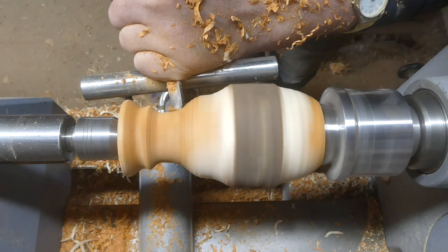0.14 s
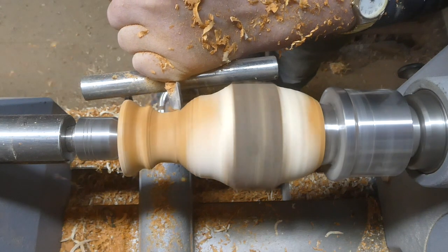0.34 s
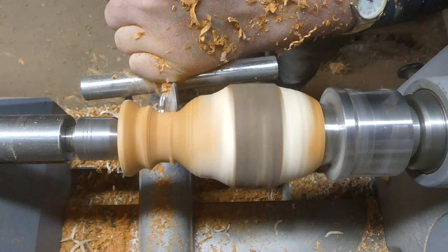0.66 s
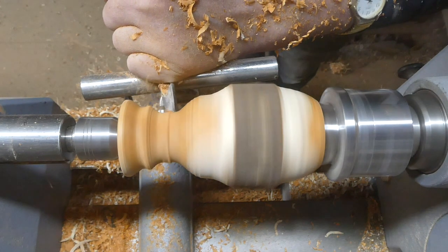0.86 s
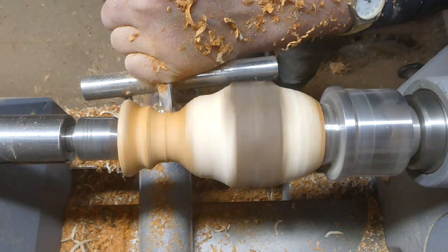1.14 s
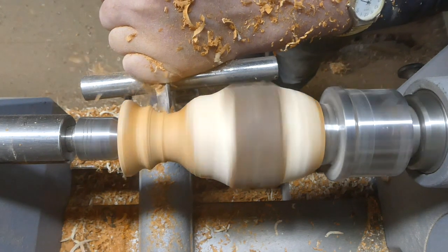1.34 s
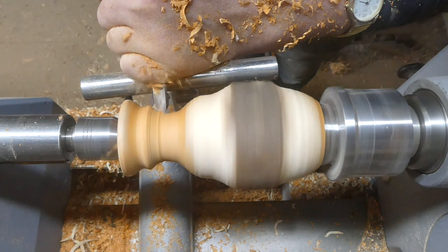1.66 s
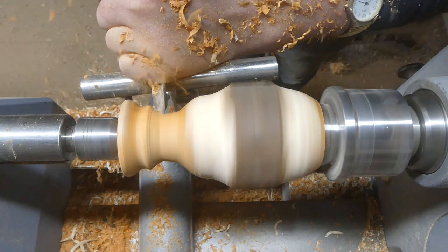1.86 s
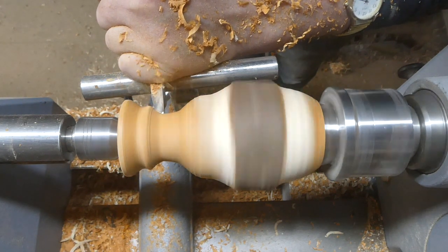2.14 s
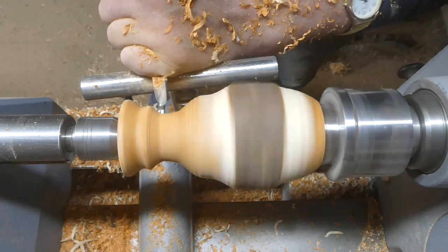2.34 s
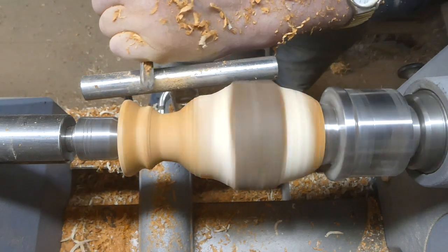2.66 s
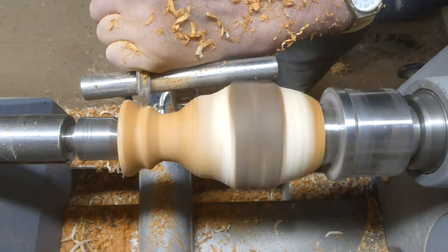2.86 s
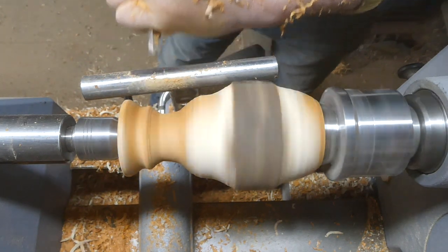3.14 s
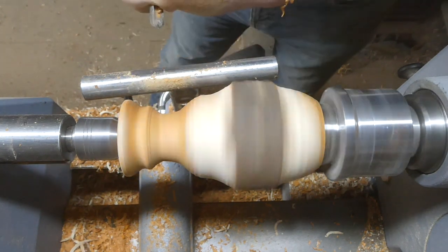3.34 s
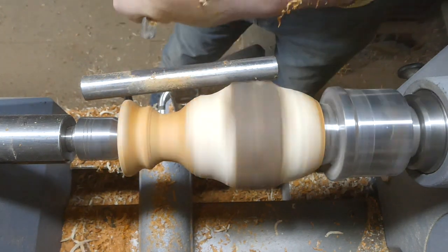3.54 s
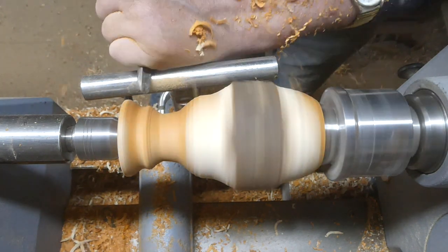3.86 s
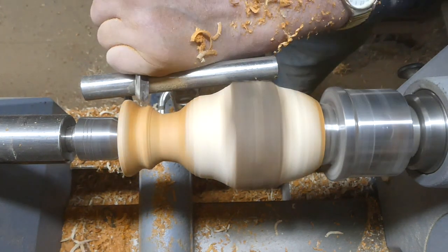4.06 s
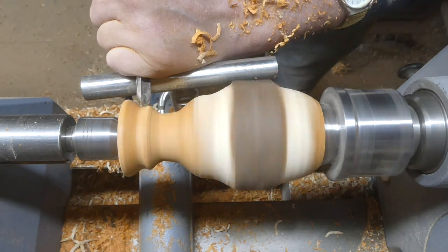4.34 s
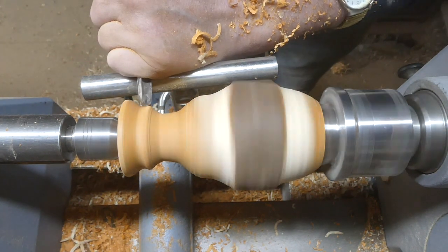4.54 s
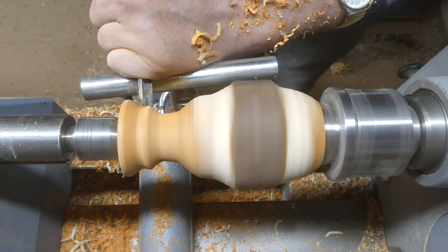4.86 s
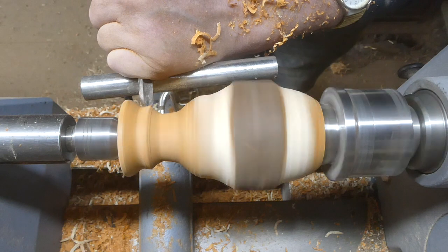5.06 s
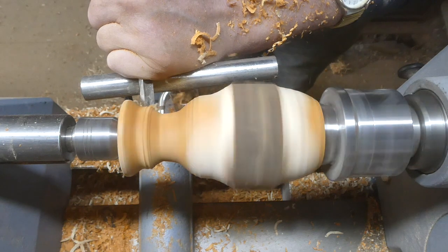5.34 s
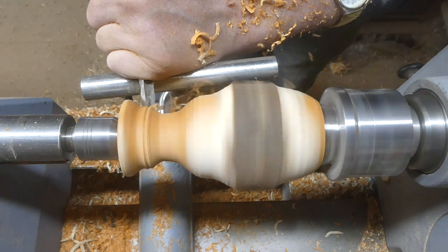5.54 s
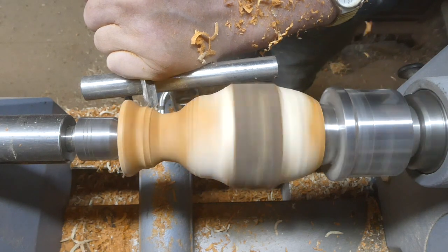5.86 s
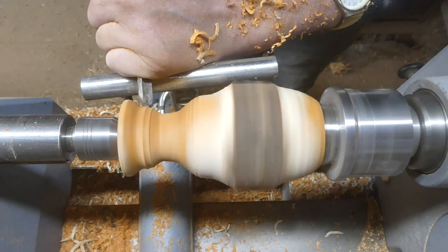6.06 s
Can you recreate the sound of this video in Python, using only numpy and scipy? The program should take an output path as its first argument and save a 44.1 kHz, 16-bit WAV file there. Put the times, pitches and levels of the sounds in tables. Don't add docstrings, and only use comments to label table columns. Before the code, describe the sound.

The sound opens mid-cut, close to a wood lathe: a tool tears spinning wood in a loud, bright rush, fluttering about fifteen times a second and spattered with crisp, high chip snaps. It dips around 0.3 to 0.45 s, then settles into a fuller, more resonant rasp with faint singing tones and drier ticks. From 1.8 s it thins to a scrape and ends near 2.2 s. The motor idles quietly, a low hum with steady tones and a thin high whine, creeping slightly louder. Light steel taps fall at 3.0 and 3.25 s, a rubbing slide with a tap around 3.6 s, and a hard, briefly ringing knock at 3.85 s. A light touch at 4.6 s leads into the second cut from 4.8 s, strong and throbbing with lower, woodier snaps, scraping towards 5.7 s and gone by 5.9 s. The idling hum closes in a short workshop reverberation.

```python
import sys
import numpy as np
from scipy import signal
from scipy.fft import rfft, irfft
from scipy.io import wavfile
from scipy.ndimage import uniform_filter1d

SR = 44100
rng = np.random.default_rng(int(sys.argv[2]) if len(sys.argv) > 2 else 0)


def decibels_to_gain(level_db):
    exponent = np.asarray(level_db, float) / 20
    return 10 ** exponent


def dump(signal):
    limited = np.clip(np.atleast_2d(signal).T, -1, 1)
    pcm = np.round(limited * 32767).astype(np.int16)
    wavfile.write(sys.argv[1], SR, pcm)


N = 273420

# (time [s], pressure [dB], scrape [-1 peeling to 1 scraping])
PASSES = [
    [(0.0, -2, 0), (0.045, -0.5, 0.091), (0.1, -1.5, 0), (0.2, 2.5, 0.043), (0.285, -3.5, 0.47),
     (0.31, -6, 0.24), (0.345, -3.5, 0.45), (0.43, -7, 0.57), (0.53, -3, 0.45)],
    [(0.3, -15, -0.49), (0.5, 0, -0.16), (0.74, -1, -0.079), (0.9, -1.5, -0.022), (1.65, 0, -0.25),
     (1.79, -4, 0.11), (1.83, -6, 0.57), (2.13, -14, 0.94), (2.19, -45, -0.16)],
    [(4.8, -18, .3), (4.835, 0, 0.22), (4.87, 2, -0.13), (5.05, -1.5, -0.11), (5.3, 2, -0.05),
     (5.68, 0, 0.48), (5.76, -4, 0.052), (5.83, -12.5, 0.35), (5.9, -41, .1)],
    [(4.57, -21, 0), (4.605, -0.5, .1), (4.7, -1, 0), (4.79, -4, 0), (4.84, -14, 0)],
]
SETUP_OF_PASS = [0, 1, 2, 2]
GRAIN_OF_SETUP = [0, 0, 1]
# (place [turns], width [turns], level [dB])
GRAIN = [
    [(.21, 0.01, 11), (.32, 0.084, 4), (.56, 0.046, 10), (.78, 0.014, 13)],
    [(1, 0.09, 6.5), (0.51, 0.16, 4.5), (0.35, 0.059, 7), (0.16, 0.028, -2)],
]
TURN_ZERO_S = [0., 0., 4.8]
TURNS_PER_S = [15.385, 15.385, 15.415]

PART_EDGES_HZ = [200, 1000, 2300, 6500, 15500]
SNAP_SHARE = [0.053, 0.45, 0.45, 0.21]
GRAIN_FACTOR = [0.2, 0.37, 0.56, 0.67]
PRESSURE_FACTOR = [0.66, 1.12, 1.21, 0.54]
# (blank, rest, blade, hiss [dB])
PART_DB = [
    [-47, -42, -37, -45.5],
    [-43.5, -39.5, -41.5, -48],
    [-41.5, -40.5, -42, -46],
    [-58, -46, -49, -56],
]
SCRAPE_DB = [
    [-18, 14, 0.1, -26],
    [-3.5, 3, 5.4, 5],
    [-6, -3.5, 9.2, -0.5],
    [-3, 2, 1.1, 0.1],
]
# (frequency [Hz], density [dB/Hz])
CUT_COLOUR = [
    [(88, -49), (150, -11.5), (333, -5.5), (866, -10), (1470, -21), (2120, -9), (2630, -24), (3960, -17),
     (4810, -2.5), (10900, -8.5), (15800, -26)],
    [(88, -28), (150, -14), (771, -1.5), (1010, -12), (1470, 2), (2120, -12), (2740, -5), (4040, -4),
     (5000, -6.5), (7110, -11.5), (9710, -10), (14900, -25.5), (15800, -35)],
    [(88, -40), (150, -15.5), (254, -8), (532, -6), (771, -6), (866, -7), (1890, 5.5), (2390, -11),
     (3320, -7), (4630, -13), (5630, -9), (10100, -17), (15800, -27)],
]
# (frequency [Hz], width [Hz], level [dB])
CUT_RINGS = [
    [(343, 26, -2.5), (1550, 560, 0), (2686, 290, 5), (3320, 1200, -1.5), (4970, 870, 3.5), (9500, 930, -7)],
    [(779.5, 35, 0.5), (948, 28, -2.5), (1110, 7.8, 0.0), (1500, 25, -4), (1784, 45, -4), (1900, 83, -3.5),
     (2690, 25, 0), (3050, 110, -8.5), (3580, 180, -7.5)] + [(2540, 980, -15.5), (4930, 300, -2),
     (9420, 530, -10.0)],
    [(374.0, 16, -5.0), (781, 33, 2.5), (1068, 40, -3.5), (1503, 180, 6.0), (1820, 160, -18),
     (2495, 49, -11.0), (2710, 21, -24)] + [(3290, 180, 2.5), (3680, 470, -2.5), (4620, 500, -1.5),
     (5240, 370, -12.5), (9250, 3400, -7.5)],
]
CUT_RINGS_DB = [3, 4.5, 4.5]

# (time [s], peak [dB], pitch [Hz], t60 [s])
EARLY_CHIPS = [(0.0189, -27, 4930, 0.02), (0.0358, -25, 4970, 0.02), (0.0464, -22, 4870, 0.018),
               (0.0634, -22, 4750, 0.018), (0.075, -25, 4770, 0.021), (0.1504, -27, 4830, 0.018),
               (0.1964, -23, 5090, 0.017), (0.2024, -18, 5300, 0.018), (0.2134, -22, 5100, 0.018),
               (0.2194, -27, 5280, 0.018), (0.2294, -24, 5000, 0.014), (0.2488, -22, 5220, 0.018),
               (0.2643, -17.5, 5150, 0.018), (0.2794, -27, 5160, 0.018), (0.285, -26, 4900, 0.021),
               (0.3301, -29, 5000, 0.018), (0.3364, -27, 4970, 0.018), (0.3451, -24.5, 5030, 0.02),
               (0.3716, -24, 4900, 0.018), (0.409, -22.5, 4940, 0.018), (0.437, -27, 4870, 0.018),
               (0.4723, -25, 5000, 0.018), (0.4894, -26, 5030, 0.018), (0.5054, -27, 4900, 0.018),
               (0.5324, -25, 5010, 0.02), (0.5394, -15.5, 4860, 0.018), (0.5676, -24, 5170, 0.018),
               (0.5973, -23, 4500, 0.018), (0.603, -20, 4970, 0.018), (0.632, -28, 4790, 0.018),
               (0.663, -21, 4400, 0.018), (0.6843, -34, 4960, 0.018), (0.6978, -22.5, 5010, 0.018),
               (0.7216, -24, 5320, 0.018), (0.7262, -22, 4460, 0.02), (0.7317, -21, 5020, 0.018),
               (0.7494, -37, 4970, 0.018), (0.7912, -25.5, 4860, 0.015), (0.8034, -27, 5060, 0.018),
               (0.8644, -31, 4810, 0.016), (0.9572, -26, 4930, 0.018), (0.9931, -27.5, 5230, 0.016)]
# (time [s], peak [dB], pitch [Hz], t60 [s])
LATE_CHIPS = [(1.0061, -21.5, 4900, 0.011), (1.058, -25, 4900, 0.0096), (1.076, -21.5, 5000, 0.011),
              (1.0938, -20, 4670, 0.0082), (1.1377, -25.5, 4550, 0.011), (1.1892, -22, 5180, 0.011),
              (1.2176, -25.5, 4990, 0.011), (1.2535, -27, 4540, 0.011), (1.2764, -25.5, 4830, 0.011),
              (1.3114, -24, 5000, 0.011), (1.3493, -21.5, 4910, 0.011), (1.3844, -20, 5160, 0.013),
              (1.4502, -22, 5000, 0.011), (1.4654, -26, 4640, 0.011), (1.523, -29, 4810, 0.011),
              (1.5344, -25, 4950, 0.013), (1.6382, -27, 5100, 0.011), (1.7085, -26, 4980, 0.011),
              (1.7245, -19, 5040, 0.013), (1.7742, -21.5, 4840, 0.011), (2.0487, -36, 4660, 0.011)]
# (time [s], peak [dB], pitch [Hz], t60 [s])
SECOND_CHIPS = [(4.824, -32, 3230, 0.02), (4.8359, -33, 3380, 0.018), (4.8603, -17, 1820, 0.018),
                (4.878, -30, 3300, 0.018), (4.8937, -24, 3380, 0.018), (4.9262, -21.5, 1820, 0.018),
                (4.9915, -23, 3310, 0.018), (5.0571, -22, 1840, 0.018), (5.12, -23, 3280, 0.02),
                (5.1507, -27, 3260, 0.02), (5.1859, -24, 4530, 0.017), (5.218, -27, 3280, 0.018),
                (5.25, -23.5, 3400, 0.018), (5.3176, -24, 3510, 0.018), (5.3544, -22.5, 3340, 0.018),
                (5.4004, -27, 3250, 0.018), (5.4826, -22, 3420, 0.022), (5.549, -22.5, 3900, 0.018),
                (5.6154, -24, 3500, 0.018), (5.6412, -26, 3220, 0.018), (5.7054, -26, 1750, 0.016),
                (5.7344, -28, 3690, 0.018)]
# (frequency [Hz], density [dB/Hz])
SPLINTERS = [
    [(1200, -31), (2600, -3), (3800, 1), (4900, 9), (6200, 0), (7800, -11), (9800, -3), (12000, -13.5),
     (16000, -35)],
    [(900, -16), (1900, 8), (2600, -5.5), (3400, 6), (4400, 3.5), (5600, -14), (9700, -18), (16000, -42)],
]
BLADE_NOTES_HZ = [
    [4900, 4800, 5300, 5250, 2200],
    [3220, 3900, 3400, 2100, 5200],
]
SHED_DB = [-39, -34.5, -34, -38]
# (start [s], end [s], frequency [Hz], level [dB])
CHATTER = [(0.42, .66, 1144, -51), (.58, 1.044, 1144, -49.5), (.42, 0.87, 1262, -48.5), (.4, 1.7, 784, -59),
           (.3, 1.6, 1506, -53), (0.26, 0.92, 1772, -51.5), (4.84, 5.5, 782, -54), (1.1, 1.95, 631, -60),
           (4.58, 4.81, 1530, -54.5), (1.15, 1.56, 500, -55.5), (5.1, 5.6, 372, -57),
           (4.84, 5.75, 632, -59)]

# (time [s], level [dB])
SLIDE = [(2.9, -65), (3.2, -61), (3.35, -55.5), (3.42, -54.5), (3.48, -54), (3.55, -49.5), (3.65, -50),
         (3.72, -56), (3.8, -57), (3.95, -69)]
# (frequency [Hz], density [dB/Hz])
SLIDE_COLOUR = [(350, -42), (600, -14), (1000, -17), (1330, 0), (2680, -11.5), (3270, -9.5), (7650, -21),
                (9880, -15), (15000, -34)]
# (time [s], peak [dB], contact [ms], tail [dB])
KNOCKS = [
    (3.002, -35, 3.8, -10),
    (3.2366, -27, 4.9, -14),
    (3.623, -31.5, 7.5, -3),
    (3.8587, -18.5, 9.8, -25),
]
# (frequency [Hz], density [dB/Hz])
KNOCK_COLOUR = [
    [(530, -57), (900, -31), (1550, 13), (2100, -24), (6660, -8), (7760, -16), (10400, -24), (15000, -46)],
    [(530, -50), (900, -23), (1640, -4), (5400, -11), (6200, 6), (7850, -5.5), (9700, -30), (10700, -18),
     (12900, -32), (15000, -25)],
    [(530, -41), (900, -14), (1370, -15), (2690, -11), (3320, 6), (4400, -8), (5510, -14), (9820, -12),
     (15000, -35)],
    [(530, -24), (900, -15), (1780, -13), (2570, -18), (3200, 0), (4600, -4.5), (5450, -16), (6350, -9.5),
     (8730, -20), (9930, -2), (10500, -26), (11900, -17), (15000, -38)],
]
# (frequency [Hz], level [dB], t60 [s])
REST_MODES = [(252, -30, 0.18), (1850, -23, 0.1), (4150, -22, 0.018), (9850, -17, 0.11),
              (11520, -16.5, 0.039)]

# (time [s], level [dB])
IDLE_LEVEL = [(0, -65.5), (1, -61), (2.15, -68.5), (2.6, -66), (3.4, -62.5), (3.86, -60.5), (3.92, -63),
              (4.2, -60.5), (4.8, -58.5), (5, -60), (5.8, -61.5), (6.2, -60)]
# (frequency [Hz], level [dB rms])
WHINE_LINES = [(9334, -77), (9524.5, -76), (9588.5, -76), (9841.5, -68), (9905, -64), (9968.5, -66),
               (10031.8, -72), (10095.2, -69), (10158.8, -70), (10286, -79), (10475.5, -70), (10666, -80)]
# (frequency [Hz], level [dB rms])
MOTOR_LINES = [(298.6, -76), (338, -57.5), (506.5, -67), (555, -72), (570.5, -63), (586, -68.5),
               (1071, -68.5), (1198, -70), (1315, -63), (1382, -72.5), (1577, -68), (2029, -70)]
# (time [s], level [dB])
LOAD = [(1.9, -11), (2.2, -2.5), (4.8, -1), (4.87, -19), (5.75, -3.5), (5.9, -4)]
# (frequency [Hz], density [dB/Hz])
IDLE_COLOUR = [(76, -60), (130, -31.5), (285, 0.5), (334, -20), (425, -8.5), (575, -15), (648, -14.5),
               (894, -16), (1310, -9), (1770, -12.5), (2980, -15), (3500, -18), (8310, -20), (9950, -18.5),
               (15800, -39.5)]
# (frequency [Hz], width [Hz], level [dB])
IDLE_RINGS = [(343, 86, -8), (560, 15, -27), (1055, 20, -9.5), (1317, 50, -8.5), (2037, 44, -10.5),
              (3080, 200, -16), (3830, 66, -18), (8800, 200, -19.5), (9850, 500, -34.5),
              (10600, 500, -22.5)]
# (frequency [Hz], density [dB/Hz])
RUMBLE_COLOUR = [(12, -51), (20, -13), (43, 3), (59, 4), (70, -19), (86, -2), (102, 3), (124, -5),
                 (161, 0.5), (193, -10), (220, -34), (290, -34), (480, -120)]
# (frequency [Hz], level [dB rms])
MAINS_LINES = [(100, -70.5)]

# (frequency [Hz], level [dB])
SIDE_DB = [(30, -20), (60, -26), (130, -7.5), (290, -16), (480, -8), (800, -10.5), (1410, -13),
           (2800, -11.5), (4800, -12), (7500, -12), (15000, -3.5)]
LEAN_DB = [(60, -0.15), (180, 0.88), (550, -0.33), (1650, -2.1), (4970, -0.78), (15000, 0.23)]
# (frequency [Hz], width [Hz], level [dB])
MIC_PEAK = (14850, 990, 7.4)


def cut(k, snaps_per_s=1800, snap_spread_db=-0.5, waver_db=3.0):
    s, press_db, scrape = np.transpose(PASSES[k])
    levels_db = np.c_[PART_DB[k]] + np.outer(PRESSURE_FACTOR, press_db) + np.outer(SCRAPE_DB[k], scrape)
    setup = SETUP_OF_PASS[k]
    t = np.arange(s[0], s[-1], 1 / SR)
    count = len(t)

    turn = (t - TURN_ZERO_S[setup]) * TURNS_PER_S[setup]
    grain_db = np.zeros(count)
    for at, wide, db in GRAIN[GRAIN_OF_SETUP[setup]]:
        from_grain = (turn - at + 0.5) % 1 - 0.5
        grain_db += db * np.exp(-2 * (from_grain / wide) ** 2)
    uneven = drift(count, 36)
    bite_db = waver_db * (uneven - uniform_filter1d(uneven, size=4000))
    grain_db = grain_db * (1 + 0.33 * drift(count, 24)) + bite_db

    tear = rng.standard_normal(count)
    snapping = rng.random(count) < snaps_per_s / SR
    size = np.minimum(rng.exponential(1, count), 2.5)
    snaps = evened(snapping * np.sign(tear) * decibels_to_gain(snap_spread_db * size))

    out = np.zeros(count)
    for part, level_db in enumerate(levels_db):
        share = np.clip(SNAP_SHARE[part], 0, 1)
        drive = np.sqrt(1 - share ** 2) * tear + share * snaps
        drive = drive * decibels_to_gain(GRAIN_FACTOR[part] * grain_db)
        ring = coloured(drive, CUT_COLOUR[setup], CUT_RINGS[setup], CUT_RINGS_DB[setup])
        band = signal.butter(3, PART_EDGES_HZ[part:part + 2], "band", fs=SR, output="sos")
        out += decibels_to_gain(np.interp(t, s, level_db)) * evened(signal.sosfilt(band, ring))
    fade_s = 0.02
    since_s = t - s[0] + fade_s * (k == 0)
    fade = np.minimum(np.minimum(since_s, s[-1] - t) / fade_s, 1) ** 0.5
    return s[0], out * fade


def shed(k, jitter_s=0.004, spread_db=1, detune=0.033, clear_s=0.012):
    s, press_db, _ = np.transpose(PASSES[k])
    setup = SETUP_OF_PASS[k]
    zero_s, rate, grain = TURN_ZERO_S[setup], TURNS_PER_S[setup], GRAIN_OF_SETUP[setup]
    turns = np.arange(np.floor((s[0] - zero_s) * rate), (s[-1] - zero_s) * rate)
    places = np.array(GRAIN[grain])[:, 0]
    at = zero_s + (turns[:, None] + places).ravel() / rate
    late, size, off, pick = rng.uniform(-1, 1, (200, 4))[:len(at)].T
    at = at + jitter_s * late
    notes_hz = np.array(BLADE_NOTES_HZ[grain])
    hz = notes_hz[((pick + 1) / 2 * len(notes_hz)).astype(int)] * (1 + detune * off)
    db = SHED_DB[k] + np.interp(at, s, press_db, -120, -120) + spread_db * size
    large_s = np.array(EARLY_CHIPS + LATE_CHIPS + SECOND_CHIPS)[:, 0]
    taken = abs(at[:, None] - large_s).min(axis=1) < clear_s
    return [row for row in zip(at, db - 120 * taken, hz) if row[0] > 0]


def chips(hiss_db=-0.5, level_db=-2.5, rise_s=0.0013, shed_ring_s=0.024):
    out = np.zeros(N)
    t = np.arange(1200) / SR
    taps = [coloured(t == 0, colour)[:256] for colour in SPLINTERS]
    rows = [(*row, taps[0]) for row in EARLY_CHIPS + LATE_CHIPS]
    rows += [(*row, taps[1]) for row in SECOND_CHIPS]
    for k in range(len(PASSES)):
        tap = taps[GRAIN_OF_SETUP[SETUP_OF_PASS[k]]]
        rows += [(*row, shed_ring_s, tap) for row in shed(k)]
    for (s, db, hz, ring_s, tap), noise in zip(rows, rng.standard_normal((300, len(t)))):
        puff = evened(np.convolve(noise, tap)[:len(t)])
        blow = np.sin(2 * np.pi * hz * t) + decibels_to_gain(hiss_db) * puff
        chip = np.minimum(t / rise_s, 1) * decibels_to_gain(-60 * t / max(ring_s, 0.004)) * blow
        add(out, s, decibels_to_gain(db + level_db) * chip / abs(chip).max())
    return out


def chatter():
    out = np.zeros(N)
    for start_s, end_s, hz, db in CHATTER:
        count = round((end_s - start_s) * SR)
        note = tones([(hz, db)], 3.3, 17, 0.092)[:count]
        add(out, start_s, note * signal.windows.tukey(count, 0.4))
    return out


def handling(tail_s=0.077):
    s, db = np.transpose(SLIDE)
    rub = rng.standard_normal(N) * decibels_to_gain(1.6 * drift(N, 50))
    slide_level = decibels_to_gain(np.interp(np.arange(N) / SR, s, db, -120, -120))
    out = slide_level * evened(coloured(rub, SLIDE_COLOUR))
    t = np.arange(6000) / SR
    roughness = rng.standard_normal((len(KNOCKS), len(t)))
    for (at_s, peak_db, contact_ms, tail_db), colour, rough in zip(KNOCKS, KNOCK_COLOUR, roughness):
        u = t * 1000 / contact_ms
        blow = 1.6 * np.exp(-abs(u - 0.2) / 0.07) + np.exp(-1.2 * u) * (u < 1)
        shape = np.minimum(u / 0.2, 1) * (blow + decibels_to_gain(tail_db - 60 * t / tail_s))
        hit = coloured(rough, colour) * shape
        add(out, at_s, decibels_to_gain(peak_db) * hit / abs(hit).max())
    last_s, last_db = KNOCKS[-1][:2]
    ring = sum(decibels_to_gain(d - 60 * t / t60) * np.sin(2 * np.pi * hz * t) for hz, d, t60 in REST_MODES)
    add(out, last_s, decibels_to_gain(last_db) * ring * np.minimum(t / 0.0018, 1))
    return out


def idle(casting_db=12, rings_db=5, rumble_db=-65):
    t = np.arange(N) / SR
    noise = rng.standard_normal(N) * decibels_to_gain(0.83 * drift(N, 35))
    casting = decibels_to_gain(casting_db) * evened(coloured(noise, IDLE_COLOUR, IDLE_RINGS, rings_db))
    load = decibels_to_gain(np.interp(t, *np.transpose(LOAD)))
    whine = load ** 0.17 * tones(WHINE_LINES, 2.3, 2.2, 0.025)
    motor = load * tones(MOTOR_LINES, 0.95, 25, 0.031)
    rumble = decibels_to_gain(rumble_db) * evened(coloured(rng.standard_normal(N), RUMBLE_COLOUR))
    mains = tones(MAINS_LINES, 0.91, 4.4, 0.013)
    gain = decibels_to_gain(np.interp(t, *np.transpose(IDLE_LEVEL)))
    return gain * (casting + decibels_to_gain(64) * (whine + motor)) + rumble + mains


def walls(x, t60_s):
    t = np.arange(round(0.3 * SR)) / SR
    tail = rng.standard_normal(len(t)) * decibels_to_gain(-60 * t / t60_s) * np.minimum(t / 0.0045, 1)
    return signal.oaconvolve(x, tail / np.linalg.norm(tail))[:N]


def tones(lines, waver_db, per_s, wander_turns):
    t = np.arange(N) / SR
    out = np.zeros(N)
    for hz, db in lines:
        level = np.sqrt(2) * decibels_to_gain(db + waver_db * drift(N, per_s))
        cycles = hz * t + rng.random() + wander_turns * drift(N, per_s)
        out += level * np.sin(2 * np.pi * cycles)
    return out


def drift(count, per_s):
    knots_hz = 400
    knots = rng.standard_normal(int(N / SR * knots_hz))
    lowpass = signal.butter(1, per_s, fs=knots_hz, output="sos")
    knots = evened(signal.sosfiltfilt(lowpass, knots))
    return np.interp(np.arange(count), np.arange(len(knots)) * SR / knots_hz, knots)


def coloured(x, colour, rings=(), rings_db=0):
    hz = np.fft.rfftfreq(2 ** 15, 1 / SR)
    power = decibels_to_gain(read(colour, hz)) ** 2
    for f, width, db in rings:
        power = power + decibels_to_gain(db + rings_db) ** 2 / (1 + (2 * (hz - f) / width) ** 2) ** 2
    cepstrum = irfft(np.log(power + 1e-12) / 2)
    cepstrum[1:len(hz) - 1] *= 2
    cepstrum[len(hz):] = 0
    response = irfft(np.exp(rfft(cepstrum)))[:2 ** 13]
    return signal.oaconvolve(x, response)[:len(x)]


def read(points, hz):
    f, value = np.transpose(points)
    return np.interp(np.log(hz + 1), np.log(f + 1), value)


def evened(x):
    return x / np.sqrt(np.mean(x ** 2) + 1e-20)


def add(mix, s, sound):
    part = mix[round(s * SR):][:len(sound)]
    part += sound[:len(part)]


def scene():
    work = chips() + chatter() + handling()
    for k in range(len(PASSES)):
        add(work, *cut(k))
    mid = work + decibels_to_gain(-9) * walls(work, 0.24) + idle()
    hz = np.fft.rfftfreq(N, 1 / SR)
    side = irfft(rfft(walls(mid, 0.3)) * decibels_to_gain(read(SIDE_DB, hz)), N)
    lean = decibels_to_gain(read(LEAN_DB, hz) / 2)
    left = irfft(rfft(mid) * lean, N) + side
    right = irfft(rfft(mid) / lean, N) - side
    return np.array([left, right])


def top_cut(x):
    return signal.sosfilt(signal.butter(12, 16260, fs=SR, output="sos"), x)


def record(dry):
    hz = np.fft.rfftfreq(N, 1 / SR)
    peak_hz, width_hz, peak_db = MIC_PEAK
    port = decibels_to_gain(peak_db * np.exp(-2 * ((hz - peak_hz) / width_hz) ** 2))
    heard = irfft(rfft(dry) * port, N)
    edge = signal.firwin(511, 15700, window=("kaiser", 9), fs=SR)
    mix = signal.oaconvolve(heard, edge[None], "same")
    return top_cut(mix)


dry = scene()
out = record(dry)
dump(out)
```